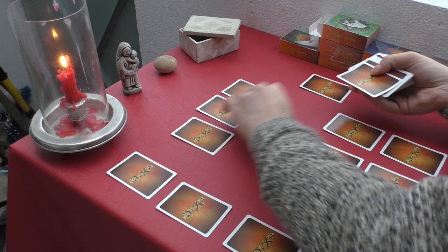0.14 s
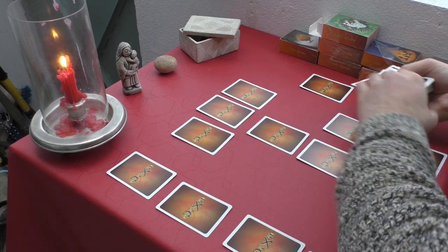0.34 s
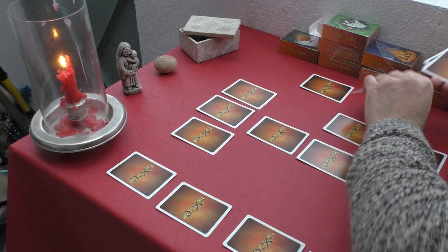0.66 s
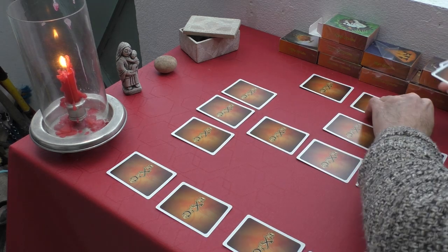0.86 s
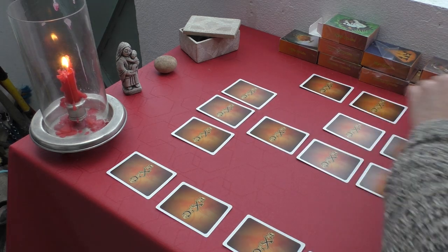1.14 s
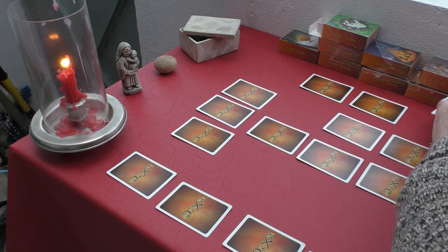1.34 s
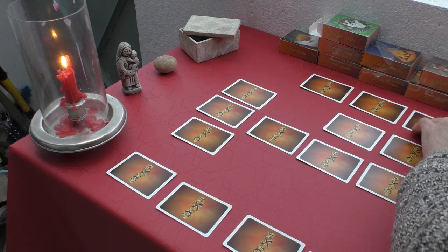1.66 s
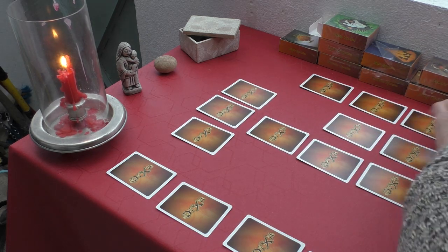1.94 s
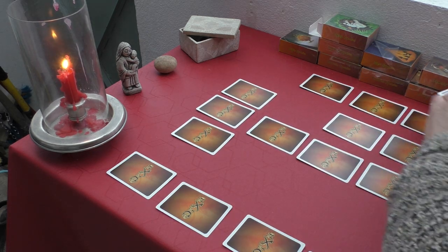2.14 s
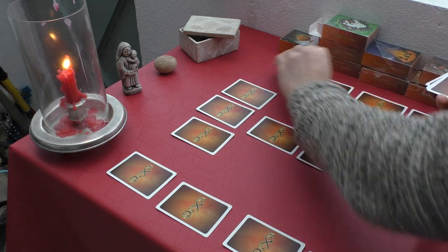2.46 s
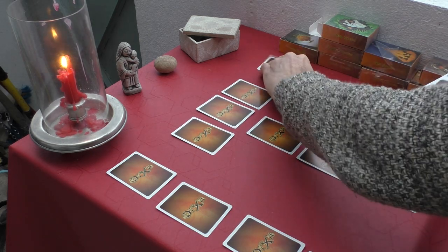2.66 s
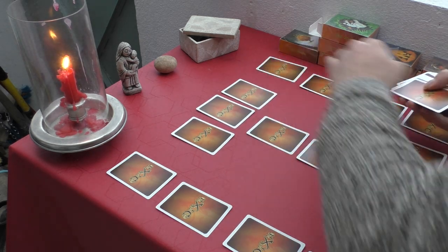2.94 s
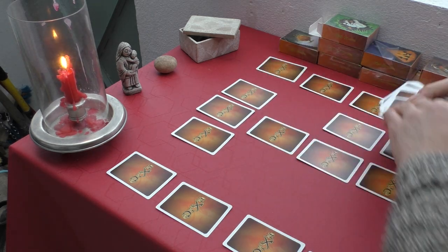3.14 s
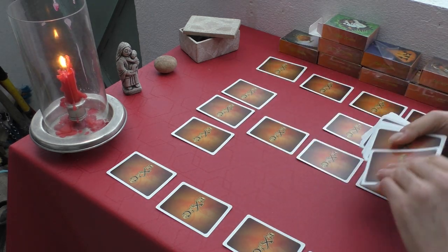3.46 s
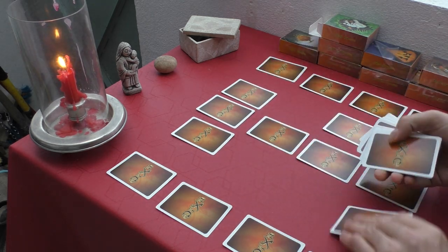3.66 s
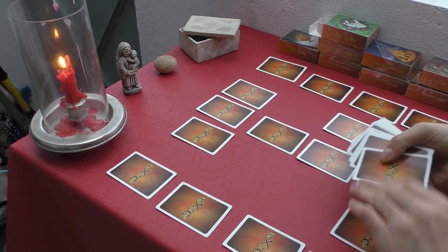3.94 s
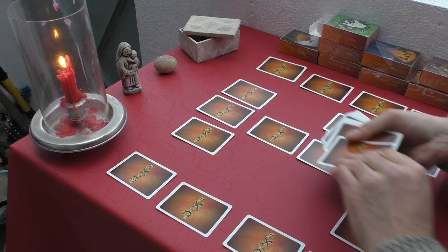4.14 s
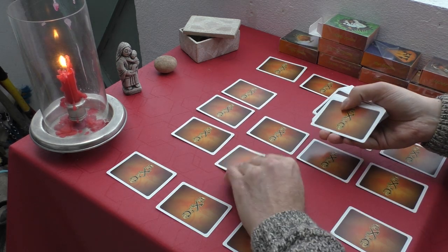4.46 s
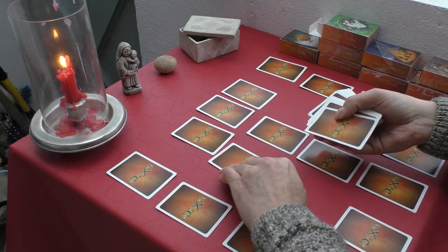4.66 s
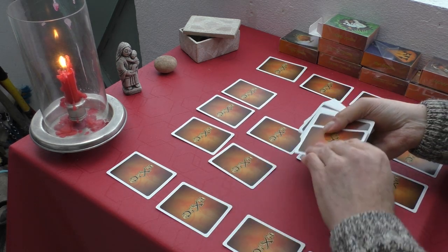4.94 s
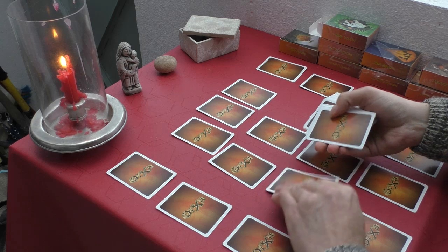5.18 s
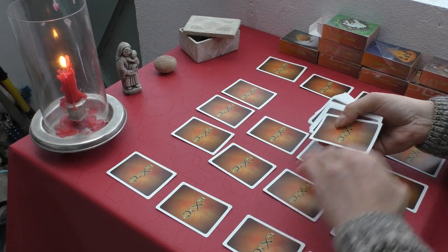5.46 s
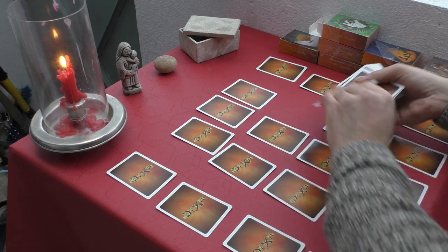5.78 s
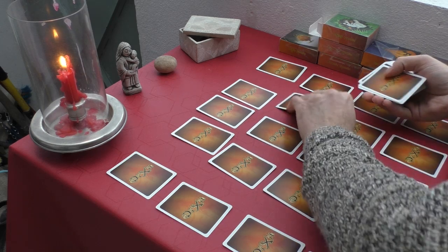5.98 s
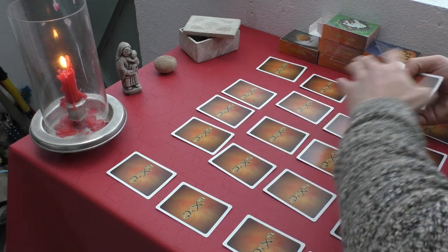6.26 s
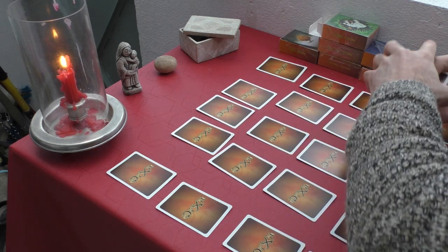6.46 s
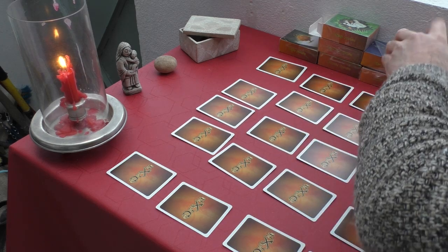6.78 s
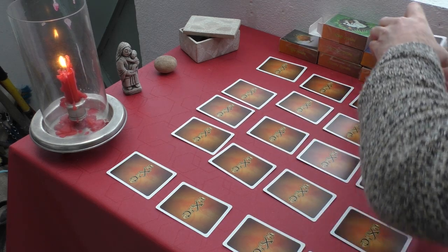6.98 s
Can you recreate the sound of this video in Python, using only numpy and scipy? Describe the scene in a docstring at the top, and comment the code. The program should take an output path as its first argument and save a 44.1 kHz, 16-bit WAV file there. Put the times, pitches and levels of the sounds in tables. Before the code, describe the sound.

Stiff playing cards snap sharply as they are dealt one by one onto a cloth-covered table, with soft slides, dull knocks and faint hiss.

```python
"""Playing cards snap as they are laid one by one on a cloth-covered table in a small hard room.
Bursts of friction noise take the colour of the card: released corners, flicks off the deck, soft slides.
Knocks, a leaning wrist and a loose dish are fading irregular forces that drive resonant modes.
Underneath lie a brief sagging hum (a wavering sine) and room noise (rumble, air and treble hiss)."""
import sys
import numpy as np
from scipy import signal
from scipy.fft import rfft, irfft, next_fast_len
from scipy.io import wavfile
from scipy.ndimage import uniform_filter1d, map_coordinates

SR = 44100
rng = np.random.default_rng(int(sys.argv[2]) if len(sys.argv) > 2 else 0)


def level_to_linear(level):
    """Convert decibel levels to linear amplitude factors, elementwise."""
    exponent = np.asarray(level, float) / 20
    return 10 ** exponent


def to_wav(sig):
    """Store sig (one row per channel, or 1-D mono) as 16-bit WAV at the path in sys.argv[1].

    Samples outside -1..1 are clipped; the rate is SR.
    """
    pcm = np.clip(np.atleast_2d(sig), -1, 1) * 32767
    pcm = np.round(pcm).astype(np.int16)
    wavfile.write(sys.argv[1], SR, pcm.T)  # frames by channels


N = 313986


def unit(x):
    """Scale to rms 1."""
    return x / np.sqrt(np.mean(x ** 2) + 1e-20)


def along(points, hz):
    """Interpolate (frequency [Hz], value) points on a log frequency axis."""
    f, v = np.transpose(points)
    return np.interp(np.log(hz + 1), np.log(f + 1), v)


def wobble(knots_per_s, count=N):
    """Smooth random curve through normally distributed knots."""
    knots = rng.standard_normal(int(count * knots_per_s / SR) + 4)
    return map_coordinates(knots, [np.arange(count) * knots_per_s / SR])


def filtered(x, response):
    """Multiply the spectrum of x by a complex response of frequency."""
    m = next_fast_len(len(x) + 8192)
    return irfft(rfft(x, m) * response(np.fft.rfftfreq(m, 1 / SR)), m)[:len(x)]


def add(track, start_s, sound):
    """Mix a sound into the track, cut at the track's end."""
    start = max(round(start_s * SR), 0)
    track[start:start + len(sound)] += sound[:len(track) - start]


def causal(gain_db, size=1024):
    """Minimum-phase pulse of energy 1 with this spectrum, by folding the cepstrum."""
    cepstrum = irfft(gain_db(np.fft.rfftfreq(size, 1 / SR)) * np.log(10) / 20)
    folded = np.concatenate([cepstrum[:1], 2 * cepstrum[1:size // 2], np.zeros(size // 2)])
    pulse = irfft(np.exp(rfft(folded)))[:size // 2]
    return pulse / np.linalg.norm(pulse)


def card_pulse(tones_hz, treble_db, bump_db, width_octaves):
    """Card colour: its bend lifts some tones, its edge sets the treble."""
    # basic card spectrum: (frequency [Hz], density [dB per Hz])
    card_spectrum = [(260, -17), (450, -11.5), (759, -13.5), (1140, -0.5), (3230, -3.5), (3990, -3),
                     (10400, -13.5), (16000, -23.5)]

    def gain_db(hz):
        bumps = sum(np.exp(-(np.log2((hz + 1) / tone) / width_octaves) ** 2) for tone in tones_hz)
        edge_db = treble_db / (1 + (7000 / (hz + 1)) ** 4)
        return along(card_spectrum, hz) + bump_db * bumps + edge_db

    return causal(gain_db)


def grit(count, rough_db):
    """Friction noise of rms 1: tiny slips of uneven size."""
    return unit(rng.standard_normal(count) * level_to_linear(rough_db * wobble(356.8, count)))


def room(sound, wet_db, toward_walls=None):
    """Direct sound, then walls that answer after a few ms; each frequency dies at its own speed."""
    # reverberation: (frequency [Hz], t60 [s])
    decay_times = [(300, 0.31), (2000, 0.25), (5000, 0.27), (12000, 0.17)]
    hz, t, z = signal.stft(rng.standard_normal(SR // 3), SR, nperseg=128)
    tail = signal.istft(z * level_to_linear(-60 * t / along(decay_times, hz)[:, None]), SR, nperseg=128)[1]
    tail = tail * np.clip(np.arange(len(tail)) / SR / 0.0046 - 0.3, 0, 1)  # echoes thicken
    tail = tail * level_to_linear(1.7 * wobble(150, len(tail)))  # and arrive in clumps
    tail = level_to_linear(wet_db) * tail / np.linalg.norm(tail)
    echo = signal.fftconvolve(sound if toward_walls is None else toward_walls, tail)
    add(echo, 0, sound)
    return echo


def snaps():
    """A bent corner drags, then lets go: a ring of a few ms and a little crackle, returned by the walls."""
    # card corners: (time [s], strength [dB], low tone [Hz], high tone [Hz], treble [dB])
    corners = [(0.153, 12, 2400, 4760, 10), (0.482, -9, 8950, 12000, 14), (1.0157, 13.5, 2210, 2920, 11),
               (1.392, -4.5, 2200, 3970, 11), (1.836, 2, 3500, 5750, 26), (2.1317, 2.5, 2030, 3800, 8),
               (2.22, 12, 1270, 5240, -6.5), (2.3295, 13, 980, 3170, 7), (2.6009, 9, 3200, 5250, 2),
               (2.7617, 11.5, 1850, 3210, -1.5), (3.216, -6, 3100, 4640, 1), (3.383, -3.5, 1400, 2860, -6),
               (3.6493, 0.5, 1180, 3500, 3), (3.688, 1.5, 1680, 3950, -10), (3.7427, -2.5, 1160, 2730, 10),
               (3.893, 2, 2940, 4540, 2), (4.1161, -6, 1630, 3840, -6), (4.1376, 0.5, 3180, 3940, 8.5),
               (4.7313, -0.5, 2800, 4150, 2), (5.174, -4, 2390, 4540, 6), (5.212, 7.5, 1500, 4960, -63),
               (5.237, 8.5, 1160, 2170, 6), (5.259, 7.5, 1550, 2250, 11), (5.4405, 3.5, 1430, 3360, 0),
               (5.5536, 1.5, 1130, 2430, -4), (5.7112, -1.5, 1240, 3620, 3), (5.763, 7, 1320, 3480, 0),
               (6.042, 10, 1850, 3240, 8), (6.1647, 11.5, 1750, 3900, 3), (6.2196, 11.5, 2400, 4730, 10)]
    lead_in_s, lead_in_db = 0.005, -25
    release_s, crackle_s, crackle_db = 0.001, 0.0053, -17.5
    wet_db, wet_per_db = -1.06, 0.14  # wet level at 0 dB strength, rise per dB of strength
    track, t = np.zeros(N), np.arange(-SR // 50, SR // 30) / SR
    drag = level_to_linear(lead_in_db) * np.exp(-np.abs(t) / lead_in_s)
    release = np.exp(-np.abs(t) / release_s)
    crackle = level_to_linear(crackle_db) * np.exp(-np.abs(t) / crackle_s)  # the card settles
    stroke = np.where(t < 0, drag, release + crackle)
    for s, db, low_hz, high_hz, treble_db in corners:
        tones_hz = [low_hz, high_hz]
        near = card_pulse(tones_hz, treble_db, bump_db=14, width_octaves=0.22)  # beamed at the microphone
        far = card_pulse(tones_hz, treble_db, bump_db=6.5, width_octaves=0.3)  # toward the walls
        spectrum = rfft(grit(len(t), rough_db=4.5) * stroke)
        force = irfft(spectrum / uniform_filter1d(np.abs(spectrum), size=25))  # whiten: card sets colour
        force = level_to_linear(db) * force / np.linalg.norm(force)
        direct = signal.fftconvolve(force, near)
        spread = signal.fftconvolve(force, far)
        add(track, s + t[0], room(direct, wet_db + wet_per_db * db, spread))
    return track


def flicks():
    """A card is pulled off the deck: friction sets in at once and dies away."""
    # pulls: (time [s], strength [dB], tone [Hz], treble [dB], length to 1/e [s])
    pulls = [(0.824, -18.5, 1470, 1.5, 0.04), (1.337, -32.5, 3630, 5, 0.053), (1.641, -22, 1950, -4, 0.077),
             (2.602, -14.5, 3280, -4.5, 0.074), (3.358, -27.5, 3480, -0.5, 0.013),
             (4.281, -43, 1600, -7, 0.079), (4.4763, -18, 2190, 0.5, 0.047), (6.033, -14.5, 2450, 8, 0.039)]
    track, t = np.zeros(N), np.arange(SR // 5) / SR
    onset = 1 - np.exp(-t / 0.00035)
    for s, db, tone_hz, treble_db, length_s in pulls:
        pulse = card_pulse([tone_hz], treble_db, bump_db=5.5, width_octaves=0.35)
        force = grit(len(t), rough_db=5.0) * np.exp(-(t / length_s) ** 2) * onset
        add(track, s, room(level_to_linear(db) * signal.fftconvolve(force, pulse), wet_db=-1.0))
    return track


def slides():
    """Card faces rub past each other, swelling and fading."""
    # rubs: (middle [s], level [dB], half length to 1/e [s], tone [Hz])
    rubs = [(0.146, -22.5, 0.0074, 4000), (0.494, -32.5, 0.017, 2010), (0.627, -28.5, 0.035, 3150),
            (0.872, -20.5, 0.022, 2400), (1.503, -28, 0.015, 2550), (1.832, -31, 0.038, 3570),
            (2.302, -24.5, 0.009, 1150), (2.317, -20.5, 0.0061, 1900), (2.621, -16, 0.012, 3400),
            (3.698, -30, 0.0091, 3900), (3.892, -35, 0.003, 4440), (5.126, -39.5, 0.026, 3000),
            (5.244, -29.5, 0.047, 1640), (5.691, -32.5, 0.011, 3620), (5.886, -40.5, 0.031, 3000),
            (6.155, -28, 0.013, 1710)]
    track, t = np.zeros(N), np.arange(SR // 3) / SR - 1 / 6
    for s, db, half_s, tone_hz in rubs:
        pulse = card_pulse([tone_hz], treble_db=-1.9, bump_db=4.5, width_octaves=0.45)
        force = grit(len(t), rough_db=3.5) * np.exp(-(t / half_s) ** 2)
        add(track, s - 1 / 6, room(level_to_linear(db) * signal.fftconvolve(force, pulse), wet_db=3.0))
    return track


def modes(body):
    """Causal response of (frequency [Hz], width [Hz], level [dB]) resonances, alternating in sign."""
    def response(f):
        total = 0
        for k, (center, width, db) in enumerate(body):
            damping = 1j * f * width
            total = total + (-1) ** k * level_to_linear(db) * damping / (center ** 2 - f ** 2 + damping)
        return total

    return response


def shaken(events, body, fade_s, rough_db):
    """Each (time [s], force [dB]) event drives the body's modes with a fading irregular force."""
    force, t = np.zeros(N), np.arange(SR // 3) / SR
    fade = np.exp(-t / fade_s) + 0.79 * np.exp(-t / 0.0028)
    fade = fade * (1 - np.exp(-t / 0.0026))  # soft onset
    for s, db in events:
        add(force, s, level_to_linear(db) * grit(len(t), rough_db) * fade)
    return filtered(force, modes(body))


def knocks():
    """Fingers press the cloth and boom the low modes of the table top."""
    # knocks: (time [s], force [dB])
    presses = [(0.166, 6.5), (0.459, -6.5), (0.841, 1.5), (1.021, 8), (1.647, 4.5), (2.22, 0), (2.329, 0),
               (2.629, 7.5), (3.659, -5.5), (3.75, -6), (3.891, -12), (4.482, -3), (4.731, -8),
               (5.241, 4.5), (5.449, -3.5), (5.569, -1), (6.042, 4), (6.219, 5), (6.319, 0.5),
               (6.409, -6.5)]
    # table top modes: (frequency [Hz], width [Hz], level [dB])
    table_top = [(140.1, 8.3, -0.5), (202.7, 6.2, -6.5), (277, 34.5, -6), (432, 28.5, -6)]
    return shaken(presses, table_top, fade_s=0.054, rough_db=-1.1)


def wrist_thud():
    """A wrist leans on the table and drives the low mode of its frame."""
    # thuds: (time [s], force [dB])
    leans = [(3.87, -10.5)]
    # table frame mode: (frequency [Hz], width [Hz], level [dB])
    table_frame = [(73, 27, 0)]
    return shaken(leans, table_frame, fade_s=0.038, rough_db=0.0)


def dish_buzz():
    """Jolts make a loose dish buzz, sharp ones in its upper modes."""
    # jolts: (time [s], force on low modes [dB], force on upper modes [dB])
    jolts = [(0.148, 5.5, 13.5), (0.2607, -3, -25), (0.439, -3.5, -25), (1.0157, 8.5, 18),
             (5.2381, 6.5, -30), (5.5543, 7.5, 1.5), (6.17, -25, 9), (6.2192, 1.5, 12), (6.3111, 1, -10),
             (6.338, -20, -3.5), (6.3926, -3, -23)]
    # dish modes, the first three are the low ones: (frequency [Hz], width [Hz], level [dB])
    dish_modes = [(424, 12.5, -4.5), (1153, 16.3, 3), (1233, 17.4, -2), (2660, 130, -12), (4465, 150, -14),
                  (4983, 64, -6), (5260, 140, -14.5), (6030, 94, -15), (6830, 125, -20.5), (10970, 60, -25),
                  (11640, 88, -21), (13100, 90, -24), (13500, 97, -26)]
    dull = [(s, low_db) for s, low_db, _ in jolts]
    sharp = [(s, high_db) for s, _, high_db in jolts]
    low = shaken(dull, dish_modes[:3], fade_s=0.029, rough_db=1.5)
    return low + shaken(sharp, dish_modes[3:], fade_s=0.029, rough_db=3.0)


def air_level_db():
    """Background level: it sinks suddenly near 2.8 s, steps partly up near 4.5 s, then rises slowly."""
    # airy noise: (time [s], level [dB])
    levels = [(0, -31), (2.7, -32.5), (2.86, -47), (4.44, -46), (4.6, -41), (5.6, -39), (6.6, -39),
              (7.12, -37)]
    s, db = np.transpose(levels)
    return np.interp(np.arange(N) / SR, s, db)


def hum():
    """A low tone in the background sets in, sags, wavers and goes."""
    on_s, off_s, edge_s = 2.33, 3.26, 0.06
    start_hz, sag_hz_per_s, over_air_db = 168, 12, -9.5
    t = np.arange(N) / SR
    gate = np.clip(np.minimum(t - on_s, off_s - t) / edge_s + 0.5, 0, 1)
    hz = start_hz - sag_hz_per_s * (t - on_s) + 3.22 * wobble(4.8)
    level = level_to_linear(air_level_db() + over_air_db + 1.4 * wobble(3.36))
    return np.sqrt(2) * gate * level * np.sin(2 * np.pi * np.cumsum(hz) / SR)


def rush(spectrum, patchy_db):
    """Coloured noise of rms 1 with time-frequency patches of random gain."""
    z = signal.stft(rng.standard_normal(N + 512), nperseg=512)[2]
    field = uniform_filter1d(rng.standard_normal(z.shape), 6, 0)
    field = uniform_filter1d(field, 10, 1)
    noise = signal.istft(z * level_to_linear(patchy_db * unit(field)), nperseg=512)[1][:N]
    return unit(filtered(noise, lambda hz: level_to_linear(along(spectrum, hz))))


def hiss():
    """Room rumble, airy noise and treble hiss drift with one level."""
    # rumble: (frequency [Hz], density [dB per Hz])
    rumble_spectrum = [(20, -19), (100, -5), (140, 0), (460, -2), (570, -15), (800, -18), (1100, -74)]
    # airy noise: (frequency [Hz], density [dB per Hz])
    air_spectrum = [(300, -19), (550, -11.5), (800, -8), (1200, -0.5), (2800, -3.5), (9000, -18),
                    (12000, -27)]
    # treble hiss: (frequency [Hz], density [dB per Hz])
    fizz_spectrum = [(2940, -15), (5000, 1.5), (8540, -13.5), (10500, -1.5), (12500, -3.5), (16000, -4.5)]
    rumble_over_air_db = -6
    fizz_db, fizz_follows = -44.5, 0.74  # the treble swings less widely
    air_db = air_level_db()
    swing_db = air_db - air_db.mean()
    rumble = level_to_linear(air_db + rumble_over_air_db) * rush(rumble_spectrum, patchy_db=1.5)
    air = level_to_linear(air_db + 0.07 * wobble(13.0)) * rush(air_spectrum, patchy_db=0.73)
    fizz = level_to_linear(fizz_db + fizz_follows * swing_db) * rush(fizz_spectrum, patchy_db=0.4)
    return rumble + air + fizz


def scene():
    """Close microphone ports: nearly mono, with an unrelated difference, wider for the diffuse hiss."""
    # stereo width: (frequency [Hz], side over mid [dB])
    side_spectrum = [(60, -17), (160, -22.5), (1220, -30), (3330, -18.5), (5500, -14), (8000, -6.5),
                     (9200, -8.5), (9500, -28.5)]
    cards = snaps() + flicks() + slides()
    near = cards + knocks() + wrist_thud() + dish_buzz() + hum()
    background = hiss()
    z = signal.stft(near + level_to_linear(6.0) * background, nperseg=256)[2]
    random_phase = np.exp(2j * np.pi * rng.random(z.shape))
    unrelated = signal.istft(z * random_phase, nperseg=256)[1][:N]
    side = filtered(unrelated, lambda hz: level_to_linear(along(side_spectrum, hz)))
    return near + background + np.array([side, -side])


def band_limit(x):
    """A steep low-pass at the top of the band."""
    return signal.sosfilt(signal.butter(12, 16340, fs=SR, output="sos"), x)


def record(dry):
    """Band limit at 15.9 kHz; peaks round off at full scale."""
    limited = np.array([filtered(channel, lambda hz: hz < 15900) for channel in dry])
    mix = limited / (1 + np.abs(limited) ** 6) ** (1 / 6)
    return band_limit(mix)


dry = scene()
out = record(dry)
to_wav(out)
```